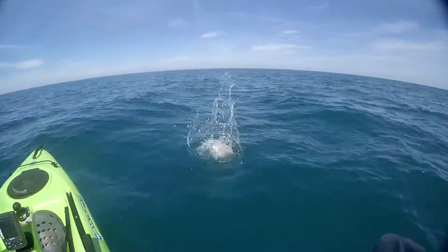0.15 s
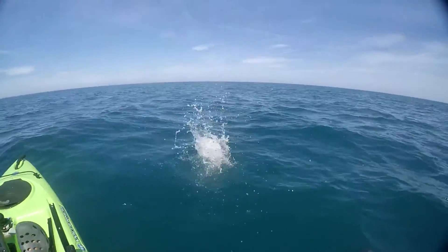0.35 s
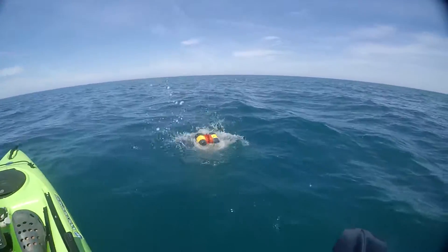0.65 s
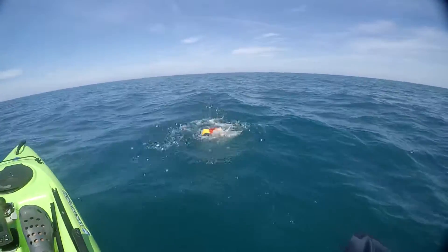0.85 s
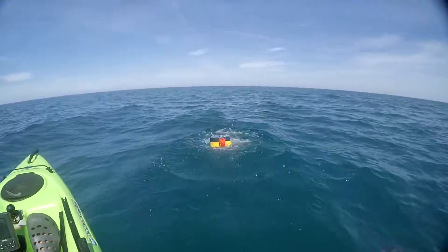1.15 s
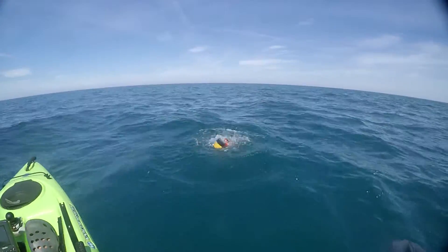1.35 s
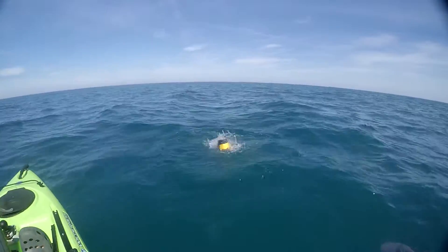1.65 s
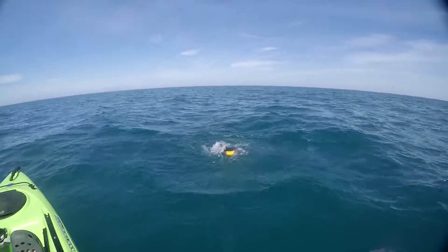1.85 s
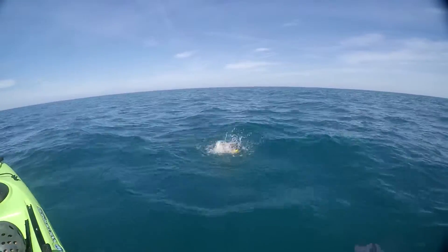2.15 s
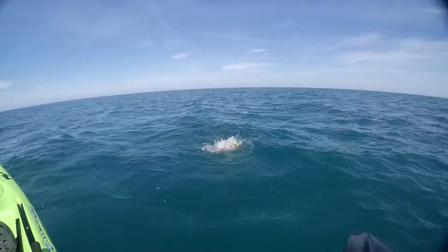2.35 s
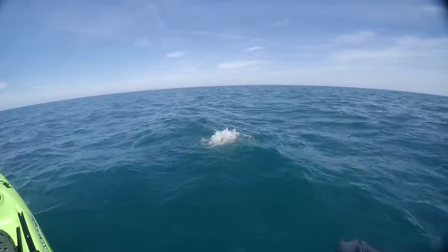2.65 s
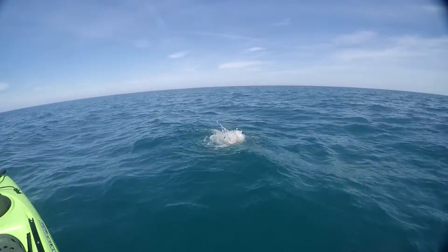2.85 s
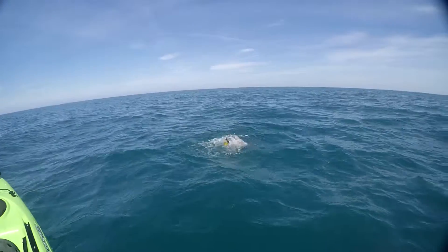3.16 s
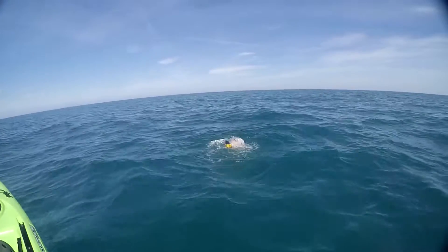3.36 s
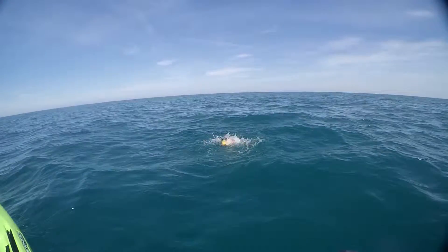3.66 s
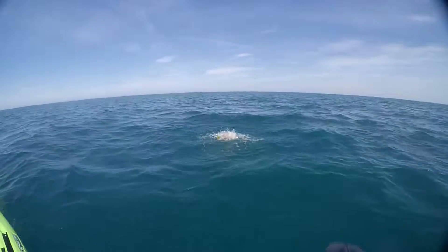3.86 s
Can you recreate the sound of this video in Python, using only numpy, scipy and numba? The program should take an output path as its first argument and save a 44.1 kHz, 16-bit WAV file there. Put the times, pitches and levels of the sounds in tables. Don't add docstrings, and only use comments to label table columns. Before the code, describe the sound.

Heavy splash into open sea, then dripping spray, faint gurgling foam and low wind rumble

```python
import sys
import numpy as np
from scipy import signal
from scipy.io import wavfile
from scipy.ndimage import uniform_filter1d
from numba import njit

SR = 44100
rng = np.random.default_rng(int(sys.argv[2]) if len(sys.argv) > 2 else 0)


def gain_from_db(level_db):
    decades = np.asarray(level_db, float) / 20
    return 10 ** decades


def waveform_to_disk(signal):
    frames = np.transpose(np.atleast_2d(signal))
    scaled = np.clip(frames, -1, 1) * 32767
    samples = np.round(scaled).astype(np.int16)
    wavfile.write(sys.argv[1], SR, samples)


N = 176400
BUBBLE_GLIDE = 0.073


def noise():
    return rng.standard_normal(N)


def unit(x):
    return x / np.sqrt(np.mean(x ** 2))


def curve(rows):
    return gain_from_db(np.interp(np.arange(N) / SR, *np.array(rows).T))


def band(x, hz, width_hz):
    return signal.lfilter(*signal.iirpeak(hz, hz / width_hz, fs=SR), x)


def steep_band(x, hz, width_hz):
    return unit(band(band(x, hz, width_hz), hz, width_hz))


def butter(x, order, hz, kind):
    return signal.sosfilt(signal.butter(order, hz, kind, fs=SR, output="sos"), x)


def butter_zero_phase(x, order, hz, kind):
    return signal.sosfiltfilt(signal.butter(order, hz, kind, fs=SR, output="sos"), x)


def walk(rate_hz):
    hold = int(SR / rate_hz)
    steps = np.repeat(rng.standard_normal(N // hold + 1), hold)
    return uniform_filter1d(uniform_filter1d(steps, hold), hold)[:N]


def bump(at_s, rise_s, fall_s):
    out = np.zeros(N)
    span = slice(max(int((at_s - 6 * rise_s) * SR), 0), min(int((at_s + 6 * fall_s) * SR), N))
    t = np.arange(span.start, span.stop) / SR - at_s
    out[span] = np.exp(-.5 * (t / np.where(t < 0, rise_s, fall_s)) ** 2)
    return out


@njit
def ring(at, hz, cycles, size, glide, n):
    out = np.zeros(n)
    for g in range(len(at)):
        tau = cycles[g] / hz[g] * SR / 3
        phase = 0.
        for i in range(min(int(5 * tau), n - at[g])):
            phase += 2 * np.pi * hz[g] * (1 + glide * i / tau) / SR
            attack = min(i / (.7 * tau), 1.)
            out[at[g] + i] += size[g] * np.sin(phase) * np.exp(-i / tau) * attack * 2
    return out


def fizz(count, lo_hz, hi_hz, cycles, spread_db):
    u = rng.random((count, 4)).T
    at = (u[0] * N).astype(np.int64)
    hz = lo_hz * (hi_hz / lo_hz) ** u[1]
    size = gain_from_db(spread_db * np.minimum(-np.log(1 - u[2]), 1.93))
    return unit(ring(at, hz, cycles * (.5 + u[3]), size, BUBBLE_GLIDE, N))


def splash():
    # time [s], level [dB], rise [s], fall [s],
    # centre [Hz].
    sheets_and_laps = [(.006, -37, 0.0056, 0.0028, 3870), (0.059, -45.5, 0.0067, 0.024, 1210),
                       (0.086, -37, 0.008, 0.016, 2600), (0.114, -29, 0.0071, 0.0069, 3000),
                       (0.129, -30.5, 0.0051, 0.011, 3000), (0.205, -47, 0.032, 0.015, 3500),
                       (.245, -57.5, 0.038, 0.014, 2020), (0.499, -50.5, 0.02, 0.032, 6600),
                       (.52, -53, 0.058, 0.054, 3500), (.64, -55, 0.032, 0.053, 3680),
                       (0.825, -51, 0.0035, 0.0099, 1800), (0.879, -45.5, 0.0018, 0.0038, 5800),
                       (0.997, -50, 0.0041, 0.014, 1920), (1.169, -58.5, 0.0052, 0.0066, 2600),
                       (1.263, -41.5, 0.0012, 0.0042, 4630), (1.359, -55.5, 0.0067, 0.0053, 1300),
                       (1.4, -54.5, 0.013, 0.017, 4080), (1.585, -55, 0.014, 0.019, 3800),
                       (2.242, -56.5, 0.043, 0.014, 2800), (2.93, -59, .02, 0.0089, 1100),
                       (3.211, -52, 0.0058, 0.0043, 1120), (3.59, -55.5, 0.01, 0.009, 3500),
                       (3.724, -56.5, 0.024, 0.022, 2730),
                       (.19, -55, 0.033, 0.024, 1300), (1.77, -63, 0.014, 0.03, 3400),
                 (1.86, -64, 0.0068, 0.013, 3100), (1.949, -57, 0.0071, 0.0064, 3400),
                 (2.02, -62, 0.013, 0.012, 2800), (.935, -60, 0.0044, 0.0087, 3600),
                 (0.98, -53, 0.019, 0.016, 440), (1.2, -58, .03, 0.018, 530), (2.7, -60, 0.034, 0.035, 294),
                 (2.09, -57, 0.01, 0.018, 3000), (2.38, -58.5, 0.032, 0.015, 2450)]
    # time [s], level [dB], rise [s], fall [s], centre [Hz], width [Hz].
    slap = (0.495, -43.5, 0.016, 0.05, 2350, 900)
    # start [s], peak [dB], centre [Hz].
    gulps = [(0.823, -57.5, 920), (0.934, -75, 920), (0.994, -66, 740), (1.076, -63, 706),
             (1.262, -50, 915), (1.344, -65.5, 740), (1.544, -60, 740), (1.574, -62, 790),
             (1.696, -56, 960), (1.729, -56.5, 724), (1.868, -56.5, 740), (1.954, -55, 714),
             (2.022, -56.5, 730), (2.041, -54, 890), (2.223, -54, 830), (2.284, -59.5, 1404),
             (2.324, -59, 710), (2.361, -58, 1293), (2.488, -59, 824), (2.621, -57.5, 791),
             (2.719, -63, 786), (2.883, -56, 680), (2.936, -57, 920), (3.088, -55, 775),
             (3.121, -53.5, 810), (3.2, -62, 1220), (3.259, -51.5, 1090), (3.309, -53, 1220),
             (3.517, -70, 855), (3.582, -57.5, 860), (3.613, -62, 740), (3.709, -63, 762),
             (3.979, -57, 815)]
    gulp_rise_s, gulp_fall_s, gulp_db = .004, .011, -2

    spray = noise() + 0.57 * fizz(count=12000, lo_hz=1420, hi_hz=12400, cycles=1.06, spread_db=6.0)
    spray = spray * gain_from_db(4 * walk(150))
    wide = 0.47 * butter(spray, 1, 1450, "high")
    out = np.zeros(N)
    for s, db, rise_s, fall_s, hz in sheets_and_laps:
        out += gain_from_db(db + 1) * bump(s, rise_s, fall_s) * (steep_band(spray, hz, 1.28 * hz) + wide)
    s, db, rise_s, fall_s, hz, width_hz = slap
    out += gain_from_db(db) * bump(s, rise_s, fall_s) * steep_band(spray, hz, width_hz)
    for s, db, hz in gulps:
        swell = bump(s + gulp_rise_s, gulp_rise_s, gulp_fall_s)
        out += gain_from_db(db + gulp_db) * swell * steep_band(spray, hz, .45 * hz)
    return out


def churn():
    # time [s], level [dB].
    churn_rows = [
        (0.0, -51),
        (.26, -52.5),
        (.36, -59),
        (.55, -55),
        (.75, -61),
        (1.12, -68),
        (1.8, -66),
        (4.0, -66.5),
    ]
    strength = curve(churn_rows)
    lap_db = 0.51 * walk(7.6) + 1.8 * walk(45)
    foam = []
    for hz, db in ((500, -9), (1100, -2), (2300, 0), (4000, -5.5), (7500, -7.5), (11000, 4.0)):
        swing_db = lap_db * (hz / 2700.0) ** 0.3 + 2.3 * walk(27)
        foam.append(gain_from_db(db + swing_db) * unit(band(noise(), hz, 0.62 * hz)))
    ticks = fizz(count=1100, lo_hz=1800, hi_hz=12600, cycles=7.2, spread_db=1.5) * gain_from_db(-0.5 + lap_db)
    blips = fizz(count=900, lo_hz=605, hi_hz=1560, cycles=10.9, spread_db=5.5) * gain_from_db(-3 + lap_db)
    hiss = strength * gain_from_db(1.5) * (sum(foam[2:4]) + ticks)
    mist_db = -35 + 2 * np.tanh(walk(29.83) + walk(75))
    mist = strength ** 0.47 * gain_from_db(mist_db) * sum(foam[4:])
    gurgle = strength ** 0.59 * gain_from_db(-25.5) * (sum(foam[:2]) + blips)
    return hiss + mist + gurgle


def drops():
    # time [s], peak [dB], pitch [Hz].
    drop_rows = [(0.402, -45, 3600), (.482, -40, 2300), (0.504, -37, 2220), (.54, -48, 2400),
                 (0.6215, -44, 4130), (0.649, -40, 4070), (0.685, -44, 3500), (0.571, -42, 2230),
                 (.572, -44, 4300), (.499, -37, 4800), (0.708, -47.5, 1150), (.732, -44, 4000),
                 (.922, -61, 2250), (1.755, -59, 3500), (1.79, -48.5, 3460), (1.992, -49, 3500),
                 (2.2446, -47.5, 4250), (0.804, -47, 3550), (0.835, -36.5, 3700), (0.88, -47.5, 3840),
                 (0.894, -67, 2200), (1.3444, -67, 2260), (2.0991, -51, 3660), (3.001, -52.5, 2200),
                 (3.034, -49, 4040), (3.4855, -54, 4300), (3.6862, -40.5, 3530)]
    s, db, hz = np.repeat(np.array(drop_rows), repeats=4, axis=0).T
    u = rng.random((len(s), 4)).T
    late_s = .004 * u[0] * (np.arange(len(s)) % 4 > 0)
    at = ((s + late_s) * SR).astype(np.int64)
    pitch_hz = hz * np.exp(0.067 * (2 * u[1] - 1))
    cycles = 10.3 * (.5 + .5 * u[2])
    return ring(at, pitch_hz, cycles, gain_from_db(db - 5.5 - 11.6 * u[3]), BUBBLE_GLIDE, N)


def flecks():
    return gain_from_db(-89 + 6.5 * np.tanh(walk(54))) * steep_band(noise(), 10020, 690)


def membrane_heave():
    # time [s], level [dB].
    gust_rows = [
        (0.0, -22),
        (0.36, -21.5),
        (0.63, -28),
        (0.89, -27),
        (4.0, -34.5),
    ]
    # time [s], swing [full scale], half length [s].
    heaves = [(0.095, -0.13, 0.024), (0.126, 0.063, 0.056), (0.25, -0.23, 0.016), (0.288, 0.11, 0.044),
              (0.352, -0.29, 0.022), (0.164, 0.09, 0.0078), (0.221, 0.079, 0.017), (0.429, 0.11, 0.0093),
              (0.465, -0.13, 0.012), (.513, -0.075, 0.008), (0.557, 0.051, 0.063), (0.863, 0.12, 0.012),
              (0.907, -0.08, 0.011), (1.029, -0.26, 0.02), (1.088, 0.13, 0.02), (1.221, 0.079, 0.018),
              (1.315, -0.095, 0.021), (1.337, 0.096, 0.026), (1.943, 0.077, 0.024)]
    gust = curve(gust_rows)
    sway = gust * gain_from_db(-5.5) * unit(butter(noise(), 3, [3, 16], "band"))
    shake = gust ** .5 * gain_from_db(-38) * steep_band(noise(), 31.2, 27)
    return sway + shake + sum(swing * bump(s, half_s, half_s) for s, swing, half_s in heaves)


def membrane_flutter():
    # time [s], level [dB].
    flutter_rows = [(0, -55), (.2, -51.5), (.45, -60), (.7, -67), (1.05, -59), (1.3, -63.5), (1.5, -67.5),
                    (1.75, -61.5), (2.0, -62.5), (2.3, -65.5), (2.8, -68.5), (3.2, -67.5), (3.6, -67),
                    (4, -67.5)]
    puff_db = 3.4 * walk(4.5) + 4.24 * walk(28.06)
    flutter = np.zeros(N)
    for hz, db in ((45, -1.0), (70, -7.5), (120, -9.5), (260, -9.5)):
        flutter += gain_from_db(db + puff_db + 1.9 * walk(25.12)) * steep_band(noise(), hz, hz)
    flicks = gain_from_db(-14) * fizz(count=60, lo_hz=43.0, hi_hz=167, cycles=0.52, spread_db=7)
    return curve(flutter_rows) * (flutter + flicks)


def membrane_pops():
    # time [s], peak [dB], rise [s], fall [s].
    pop_rows = [(.005, -21.5, 0.0077, 0.0036), (0.2775, -18, 0.0013, .0014), (0.2911, -16, 0.0014, 0.00069),
                (0.3015, -17, 0.0016, 0.00082), (.308, -20, 0.0022, 0.00095),
                (0.3167, -23.5, 0.0032, 0.00055), (0.3252, -26.5, 0.013, 0.00051),
                (0.505, -33.5, 0.0025, 0.0011), (0.859, -25.5, 0.0015, 0.0011),
                (0.873, -37.5, 0.0044, 0.001), (1.002, -43, 0.0034, 0.002), (1.25, -61, 0.0021, 0.008),
                (2.163, -37, 0.0019, 0.0018), (2.856, -38.5, 0.0033, 0.0011),
                (3.292, -42.5, 0.0069, 0.00083), (3.556, -34.5, 0.003, 0.0028),
                (3.98, -43.5, 0.006, 0.00094)]
    # time [s], peak [dB], rise [s], fall [s].
    dent_rows = [
        (0.097, -27, 0.0017, 0.00066),
        (0.1091, -18, 0.012, 0.00061),
        (0.1243, -25, 0.0063, 0.00039),
        (.141, -35, 0.0075, 0.0054),
    ]
    grit = 0.069 * 6 * 1.4 * steep_band(noise(), 1000, 1040)
    pops = sum(gain_from_db(db) * bump(s, rise_s, fall_s) for s, db, rise_s, fall_s in pop_rows)
    pops = butter(pops * (1 + grit * pops), 1, 29.4, "high")
    dents = sum(gain_from_db(db) * bump(s, rise_s, fall_s) for s, db, rise_s, fall_s in dent_rows)
    dents = butter_zero_phase(dents, 3, 264, "low")
    return butter_zero_phase(pops - dents, 2, [35.5, 1300], "band")


def membrane_buffets():
    # time [s], peak [dB].
    buffet_rows = [(0.605, -58), (1.197, -52), (1.254, -46), (1.365, -50), (1.598, -71), (2.407, -57),
                   (2.466, -49), (2.541, -52.5), (2.711, -55), (3.379, -53), (3.453, -55), (3.622, -62),
                   (3.747, -50.5), (3.855, -57)]
    lag_s, half_s = 0.015, 0.0059
    swell = sum(gain_from_db(db - 6) * bump(s + lag_s, half_s, half_s) for s, db in buffet_rows)
    return swell * steep_band(noise(), 102, 102)


def wind():
    return membrane_heave() + membrane_flutter() + membrane_pops() + membrane_buffets()


def housing(water):
    # centre [Hz], width [Hz], gain [dB].
    case_modes = [(365, 242, -3.5), (927, 159, -3), (1100, 263, -5.5), (1377, 178, -2.5), (2226, 283, -7.5),
                  (3500, 440, -5), (4250, 570, -6), (5430, 560, -9.5), (7470, 830, -16.5), (9880, 470, -14),
                  (11750, 11700, -20.5)]
    return sum((-1) ** k * gain_from_db(db) * band(water, hz, width_hz)
               for k, (hz, width_hz, db) in enumerate(case_modes))


def scene():
    mix = housing(splash() + churn()) + drops() + flecks() + wind()
    fade_out = 1 - bump(N / SR, .004, .004)
    return (mix * fade_out)[None]


def roll_off(x):
    return signal.sosfilt(signal.butter(12, 15360, fs=SR, output="sos"), x)


def record(dry):
    # start [s], end [s].
    open_spans = [(-.1, .02), (.1, .14), (.47, .55), (.61, .68), (.75, .79), (.92, .97), (1.11, 1.17),
                  (1.24, 1.29), (1.37, 1.45), (1.56, 1.625), (2.09, 2.2), (2.24, 2.31), (2.35, 2.39),
                  (2.47, 2.865), (2.94, 3.4), (3.475, 3.69), (3.73, 3.84), (3.88, 4.1)]
    x = dry + gain_from_db(-80) * rng.standard_normal(dry.shape)

    def below(hz):
        return signal.sosfiltfilt(signal.ellip(10, .05, 45, hz, fs=SR, output="sos"), x)

    t = np.arange(N) / SR
    low = below(12900)
    is_open = 1. * sum((t > start_s) & (t < end_s) for start_s, end_s in open_spans)
    gate = uniform_filter1d(is_open, size=300)
    return roll_off(low + gate * (below(15250) - low))


dry = scene()
out = record(dry)
waveform_to_disk(out)
```